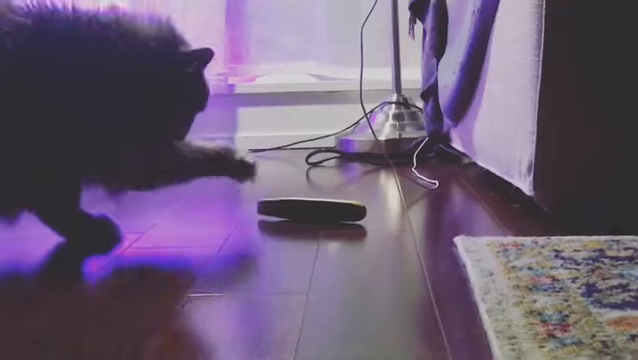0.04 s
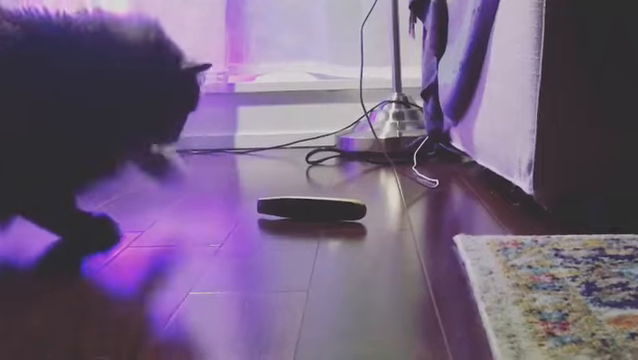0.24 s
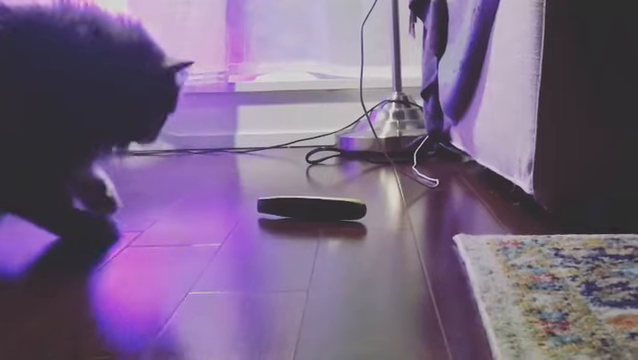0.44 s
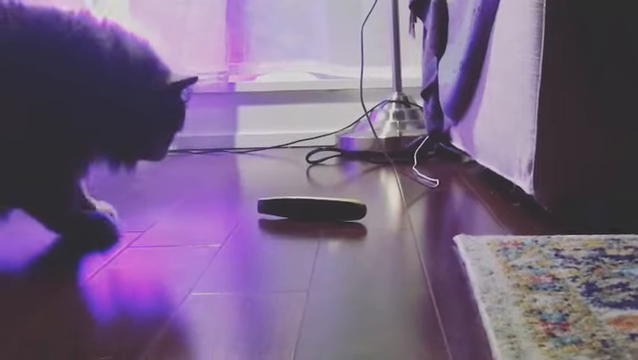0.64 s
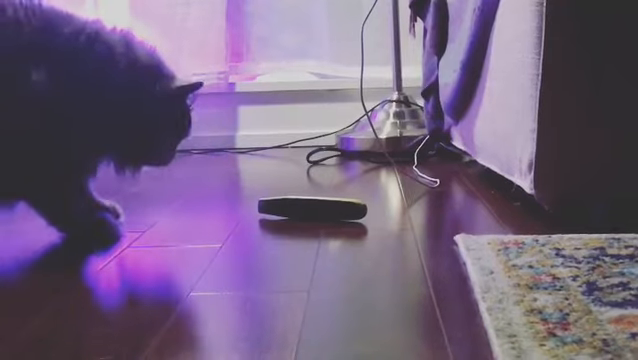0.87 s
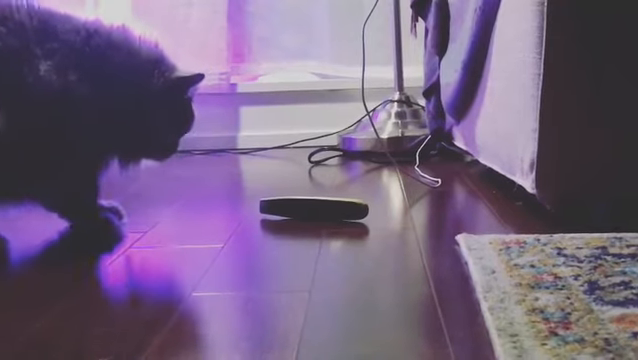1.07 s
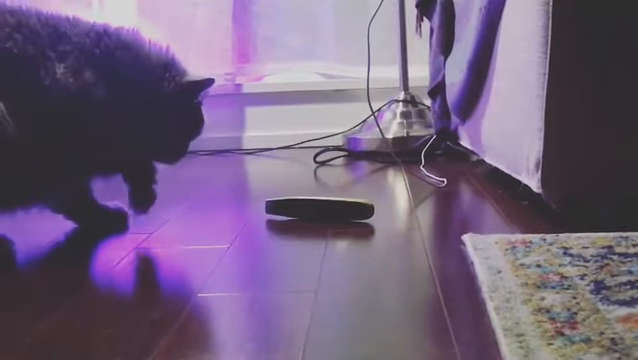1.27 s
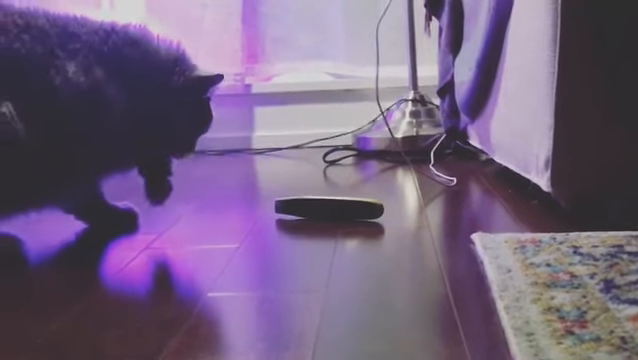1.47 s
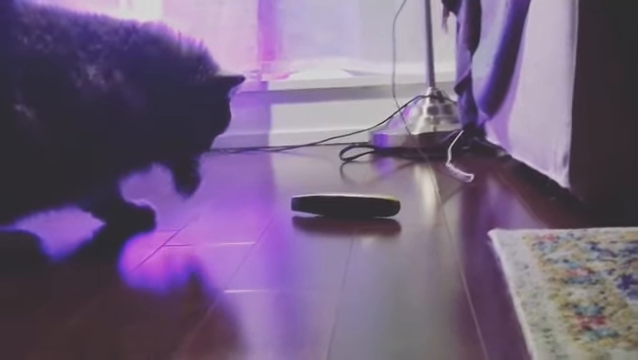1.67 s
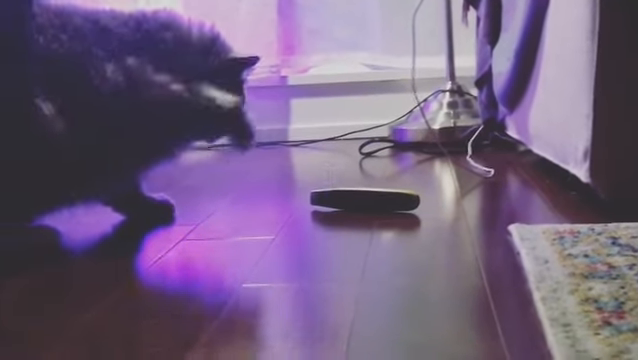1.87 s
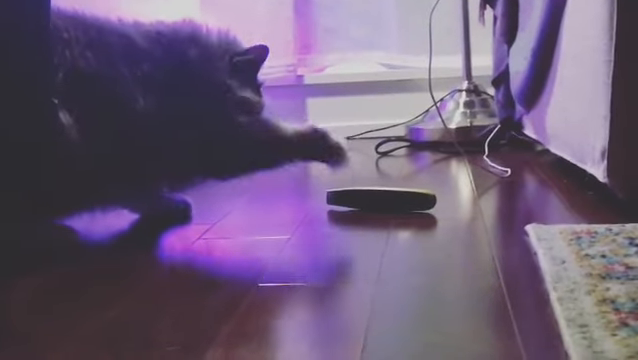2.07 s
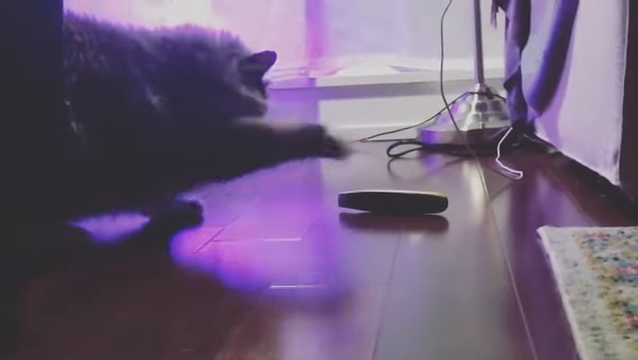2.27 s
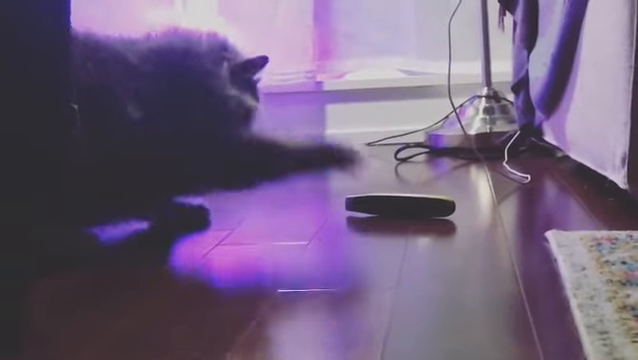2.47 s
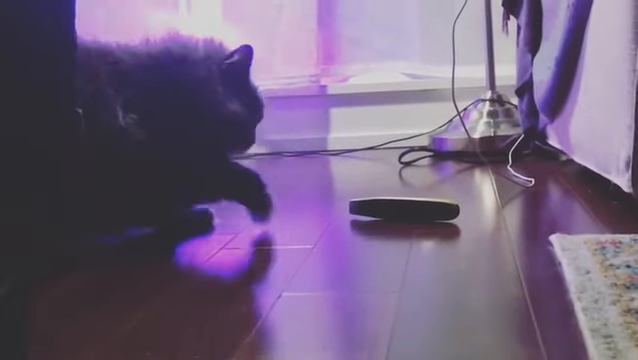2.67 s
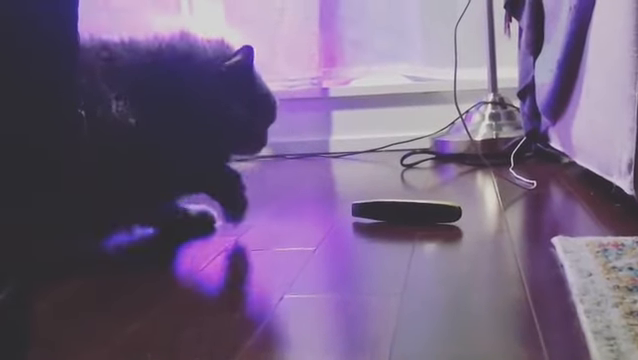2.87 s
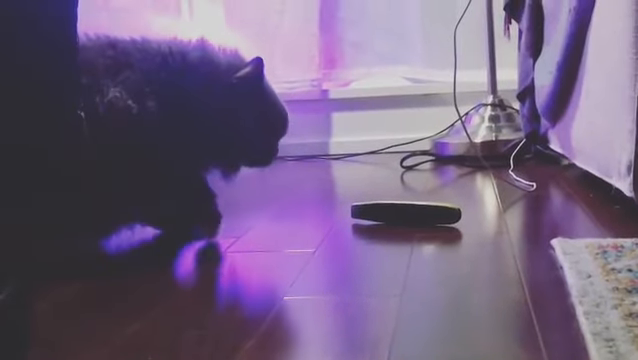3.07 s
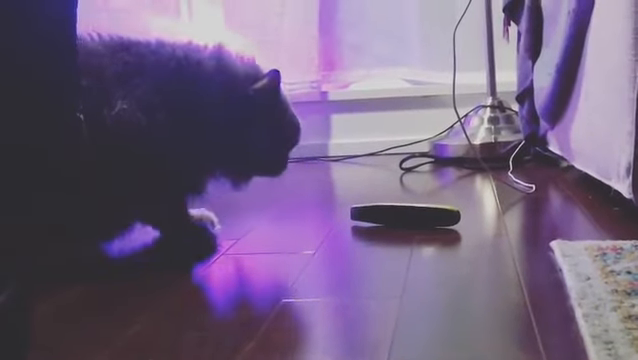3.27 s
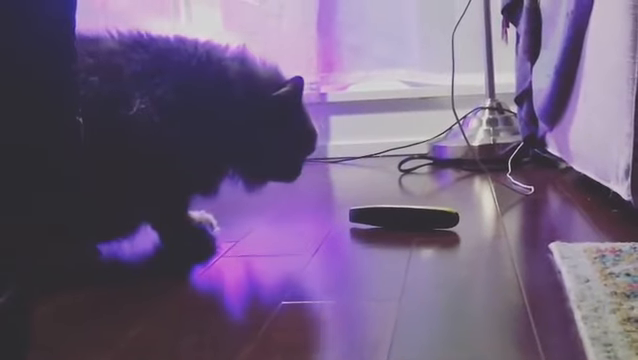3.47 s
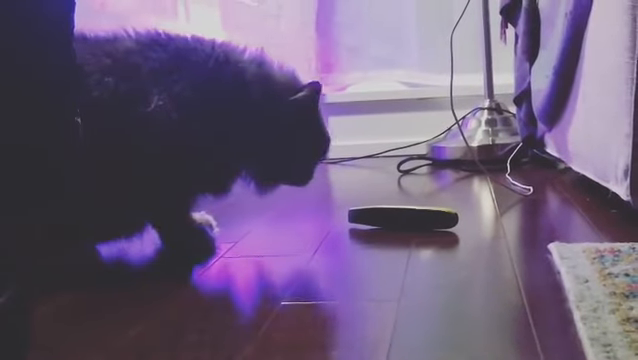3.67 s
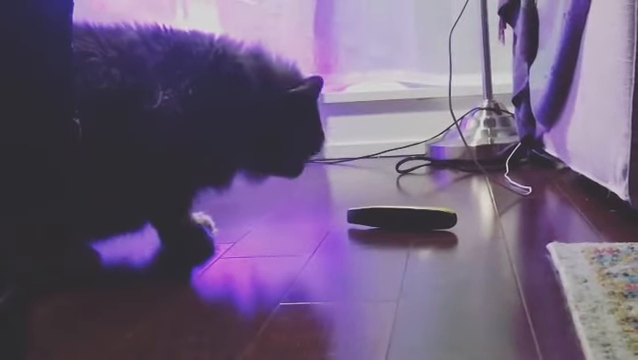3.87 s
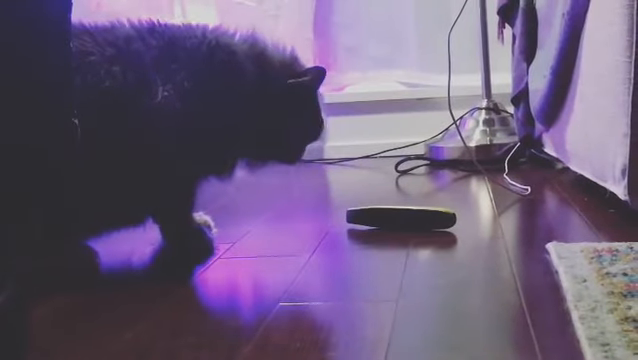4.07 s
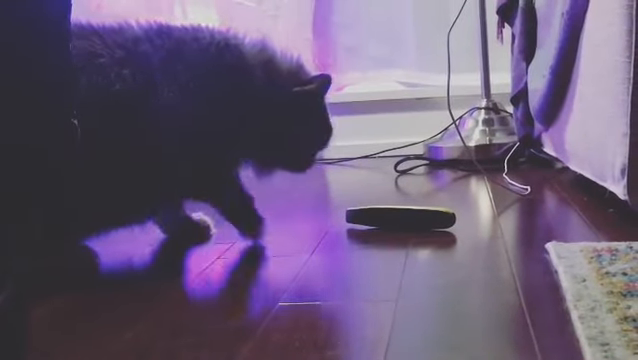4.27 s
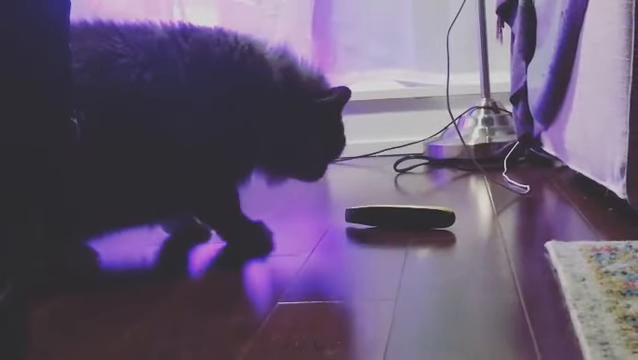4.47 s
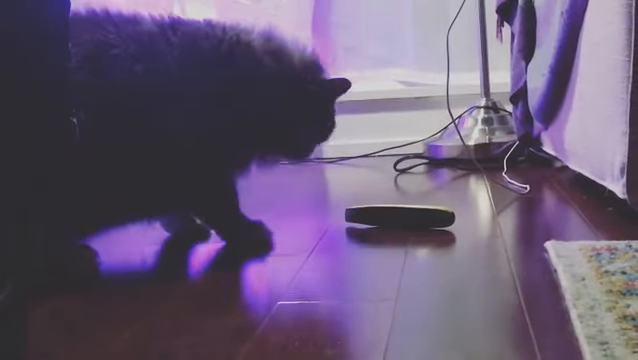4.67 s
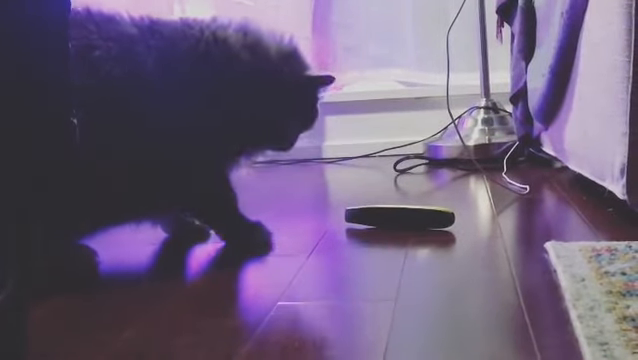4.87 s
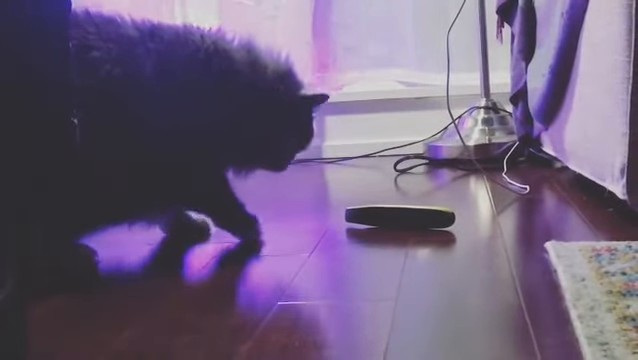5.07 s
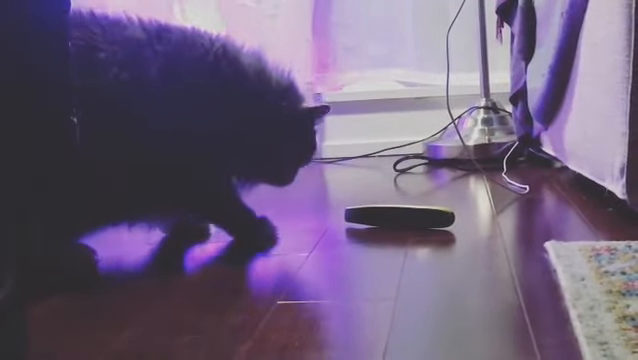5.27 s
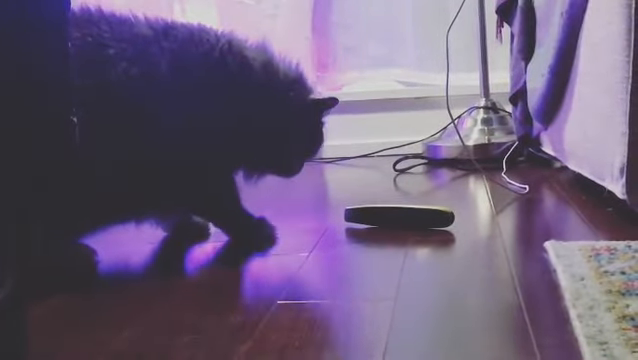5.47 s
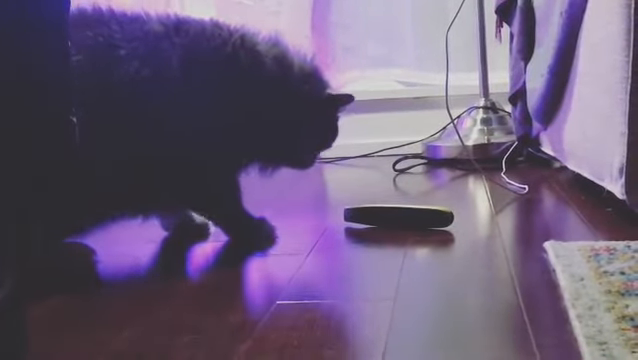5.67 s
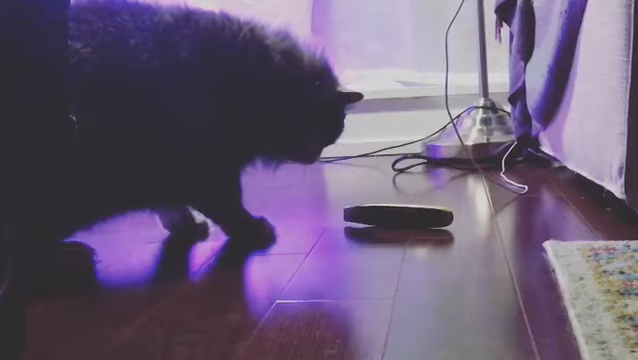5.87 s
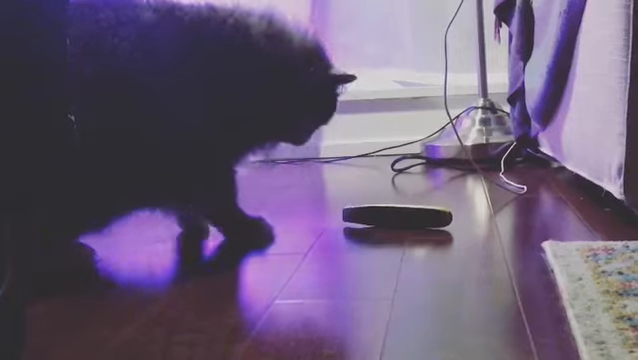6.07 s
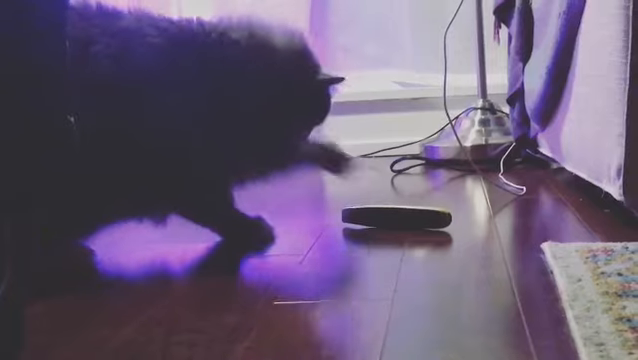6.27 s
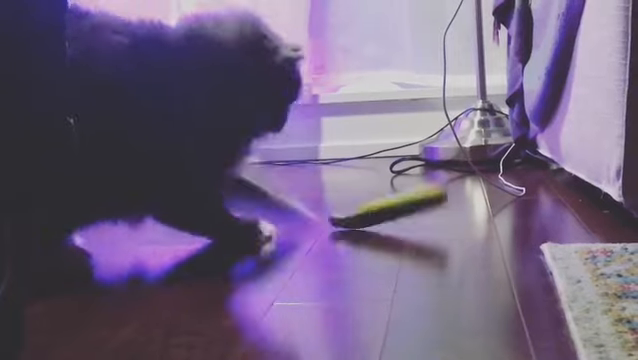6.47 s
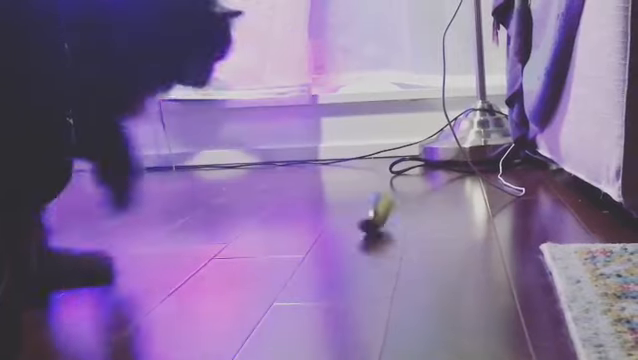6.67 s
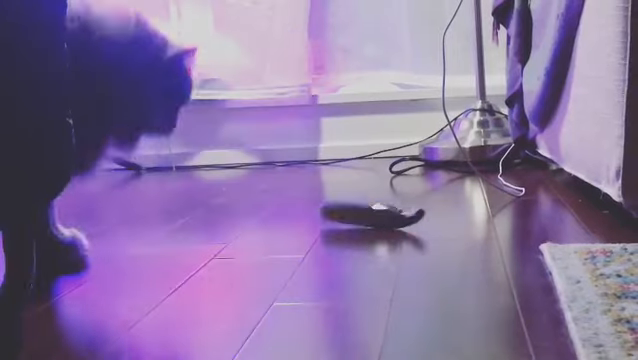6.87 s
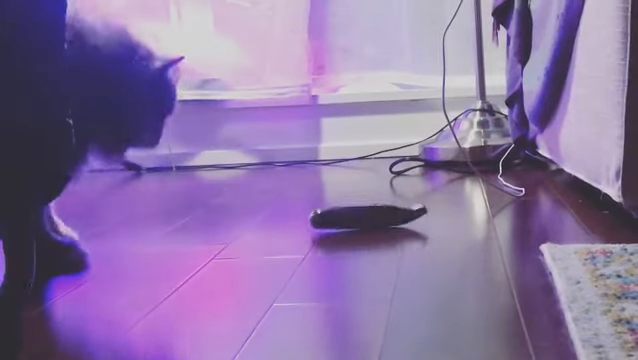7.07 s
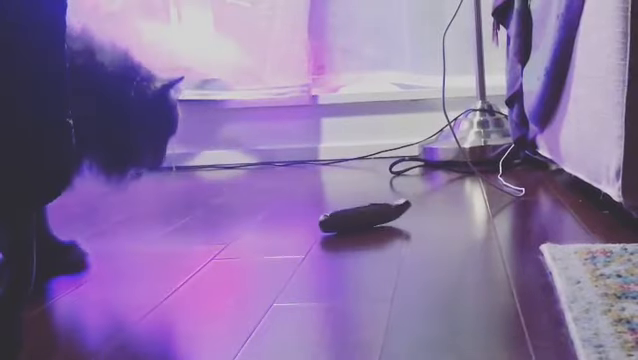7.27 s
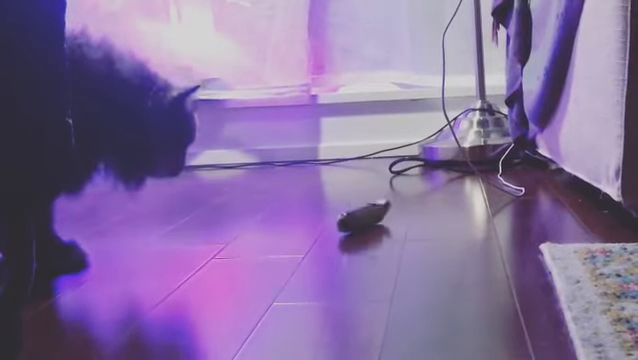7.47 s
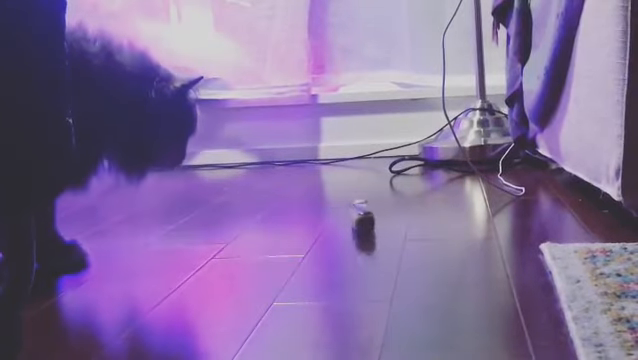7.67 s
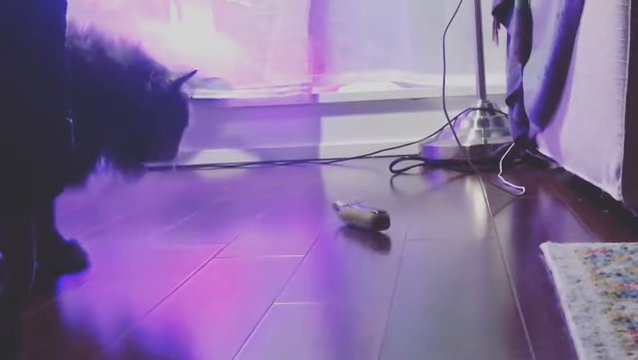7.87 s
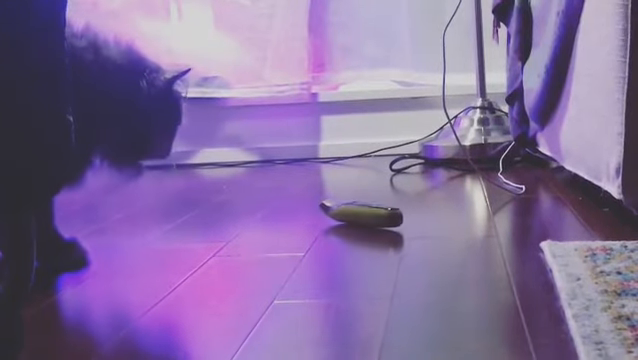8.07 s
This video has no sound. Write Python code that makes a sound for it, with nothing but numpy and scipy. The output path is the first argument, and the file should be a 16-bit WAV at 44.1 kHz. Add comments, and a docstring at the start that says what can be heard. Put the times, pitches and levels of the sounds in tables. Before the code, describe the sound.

An electric shaver buzzes continuously on a wooden floor indoors, close to a low microphone. Faint paw scuffs and soft low thuds barely show beside it. Late on, a cat swats it: a loud cluster of plastic clicks and woody knocks rattles for under a second, ringing in the floor and room. The buzz carries on, its treble brightening and dulling as the shaver slowly turns.

```python
"""Room with a wooden floor: an electric shaver buzzes on the planks while a cat creeps up and swats it.
Its drive makes three strokes a turn: fixed harmonics of the case plus noise gated by each stroke.
Swatted, it clatters on planks and plastic, floor modes and room ring, and it spins slowly on, buzzing.
Narrow-band hisses swell as it turns; around it: noise-burst paw scuffs, low rumble with thuds,
steady air and faint passing hums."""
import sys
import numpy as np
from scipy import signal
from scipy.fft import rfft, irfft
from scipy.io import wavfile

SR = 44100
rng = np.random.default_rng(int(sys.argv[2]) if len(sys.argv) > 2 else 0)


def persist_wave(psi):
    """Save psi, clipped to +-1, as 16-bit WAV."""
    counts = np.round(np.clip(psi, -1, 1) * 32767).astype(np.int16)
    wavfile.write(sys.argv[1], SR, np.atleast_2d(counts).T)


N = 358523
T = np.arange(N) / SR
FREQS = np.arange(N // 2 + 1) * SR / N
TOP_HZ = 13950
TURN_HZ = 39.922
SWAT_S = 6.56


def undb(db):
    """Decibels to gain."""
    return 10 ** (np.asarray(db) / 20)


def along(rows, f, axis=1):
    """One column of a frequency table, interpolated on a log-frequency axis."""
    rows = np.array(rows)
    return np.interp(np.log(f + 1), np.log(rows[:, 0]), rows[:, axis])


def noise(db):
    """Gaussian noise with the given density in dB per Hz."""
    return irfft(rfft(rng.standard_normal(N)) * undb(db), N) * np.sqrt(SR / 2)


def walk(rate_hz):
    """Smooth random drift of unit spread: noise low-passed at rate_hz."""
    sos = signal.butter(2, rate_hz, fs=SR, output="sos")
    drift = signal.sosfilt(sos, rng.standard_normal(N))
    return drift / drift.std()


def lowpass(x, hz, order=2):
    """Butterworth cut of the treble above hz, at most TOP_HZ."""
    return signal.sosfilt(signal.butter(order, min(hz, TOP_HZ), fs=SR, output="sos"), x)


def hiss(hz, half_width_hz):
    """Narrow-band noise of unit spread: a carrier modulated by a random drift."""
    return np.sqrt(2) * walk(half_width_hz) * np.cos(2 * np.pi * hz * T)


def wavering_tone(hz, wander_hz, rate_hz):
    """Sine whose frequency drifts with a spread of wander_hz."""
    return np.sin(2 * np.pi * np.cumsum(hz + wander_hz * walk(rate_hz)) / SR)


def envelope(start_s, attack_s, hold_s, release_s):
    """Straight rise, hold, exponential fall with time constant release_s."""
    age_s = T - start_s
    fall = np.exp(-np.maximum(age_s - attack_s - hold_s, 0) / release_s)
    return np.clip(age_s / attack_s, 0, 1) * fall


def swells(rows):
    """Sum of event envelopes, each peaking at its level half its length after onset."""
    total = np.zeros(N)
    for start_s, db, length_s in rows:
        age = np.maximum(T - start_s, 0) * 2 / length_s
        total += undb(db) * age * np.exp(1 - age)
    return total


def rumble():
    """Low filtered noise of the home whose level swells, with soft thuds standing out of it."""
    level_db, swell_db, swell_hz = -47.5, 1, 7.5
    # rumble colour: (frequency [Hz], relative level [dB])
    colour = [(20, -36), (28, -26), (38, -15), (52, -10.5), (66, -3.5), (82, 3), (105, -6), (140, -6),
              (180, -21), (260, -64)]
    # thuds: (time [s], level [dB], length [s])
    thuds = [(1.04, -46, 0.12), (1.49, -43, 0.061), (3.03, -44, 0.07), (5.45, -46.5, 0.1)]
    low = noise(along(colour, FREQS))
    swell = np.hypot(undb(level_db + swell_db * walk(swell_hz)), swells(thuds))
    return low / low.std() * swell


def air():
    """Steady air of the room: stationary coloured noise."""
    # air spectrum: (frequency [Hz], density [dB per Hz])
    density = [(20, -110), (130, -77.5), (200, -74), (280, -79.5), (345, -83), (430, -79.5), (500, -91),
               (640, -80.5), (725, -81), (800, -99)]
    return noise(along(density, FREQS))


def hums(attack_s=0.068, release_s=0.13, wander_hz=9):
    """Faint low tones, wavering in pitch, that come and go."""
    # hums: (time [s], hold [s], frequency [Hz], level [dB])
    passing = [(0, .2, 375.5, -54.5), (0.944, 0.13, 268, -53.5), (3.28, 0.68, 265.5, -52.5)]
    total = np.zeros(N)
    for start_s, hold_s, hz, db in passing:
        level = undb(db) * envelope(start_s, attack_s, hold_s, release_s)
        total += level * wavering_tone(hz, wander_hz, rate_hz=27.6)
    return total


def cat(grain_db=2, creak_hz=1450, creak_wander_hz=45):
    """Short, grainy noise bursts as paws tap and scuff, the first with small wavering creaks."""
    # taps and scuffs: (time [s], level [dB], length [s])
    scuffs = [(1.943, -46, 0.012), (1.955, -47, 0.022), (1.992, -43, 0.0075), (2.023, -50, 0.016),
              (2.576, -45, 0.014), (2.587, -44, 0.023), (2.614, -48, 0.046)]
    # scuff colour: (frequency [Hz], relative level [dB])
    colour = [(100, -7), (280, 2.5), (480, -6), (760, -3.5), (1150, -10), (1450, -8), (1800, -16),
              (2300, -6), (5000, -42)]
    # creaks: (time [s], level [dB], length [s])
    creaks = [(1.942, -43, .009), (1.959, -41, 0.01)]
    rub = noise(along(colour, FREQS))
    rub = rub * undb(grain_db * walk(90))
    creak = wavering_tone(creak_hz, creak_wander_hz, rate_hz=140)
    return rub / rub.std() * swells(scuffs) + creak * swells(creaks)


def response(points, spread_s=0., size=4096):
    """Causal ring of given spectrum; bending waves lag by spread_s at 1 kHz, their lows more."""
    f = np.arange(size // 2 + 1) * SR / size
    # folded cepstrum gives minimum phase
    cepstrum = irfft(np.log(undb(along(points, f))))
    cepstrum[1:size // 2] *= 2
    cepstrum[size // 2 + 1:] = 0
    bending_phase = 4 * np.pi * spread_s * np.sqrt(1000 * f)
    ring = irfft(np.exp(rfft(cepstrum) - 1j * bending_phase))
    return ring / np.abs(ring).max()


def room(x, build_s=0.0038, early_db=-8, early_s=0.0053, count=14):
    """Early bounces and a diffuse tail: noise bands, each with its own level and decay."""
    # reverberation: (frequency [Hz], level [dB], t60 [s])
    decay = [(150, -37, 1.0), (310, -1, 1), (580, -7.5, 1.04), (1010, -1, 0.5), (1960, -12, 0.66),
             (2900, -10, 0.42), (4100, -2, 0.67), (7950, -10, 1.4), (14000, -8, 0.31)]
    t = T[:2 * SR]
    f = np.arange(SR + 1) / 2
    edges_hz = np.geomspace(100, TOP_HZ, count + 1)
    diffuse = rfft(rng.standard_normal(len(t)))
    early = t * np.exp(-2 * t / early_s)
    early = undb(early_db) * early / np.linalg.norm(early)
    tail = np.zeros(len(t))
    for lo, hi in zip(edges_hz, edges_hz[1:]):
        centre_hz = np.sqrt(lo * hi)
        fade = np.exp(-np.log(1000) * t / along(decay, centre_hz, axis=2))
        fade = fade * (1 - np.exp(-t / build_s))
        late = undb(along(decay, centre_hz)) * fade / np.linalg.norm(fade)
        tail += (late + early) * irfft(diffuse * (f >= lo) * (f < hi))
    return signal.fftconvolve(x, tail)[:N]


def roll(bumps_per_s=70, count=4):
    """Random bumps as the case rocks and rolls, weaker and duller as it slows, then settles."""
    start_s, attack_s, hold_s, release_s = 6.69, 0.073, 0.35, 0.077
    level_db, fade_db_per_s = -41, -11
    bright_hz, dull_hz, slowing_s = 1680, 480, 0.17
    age_s = np.maximum(T - start_s, 0)
    strength = undb(level_db + fade_db_per_s * age_s)
    strength = strength * envelope(start_s, attack_s, hold_s, release_s)
    hits = rng.random(N) < bumps_per_s / SR
    bumps = hits * rng.standard_normal(N) * strength + 1e-18
    speed = np.exp(-age_s / slowing_s)
    # crossfade between fixed low-passes as the speed falls
    total = np.zeros(N)
    for hz, pick in zip(np.linspace(dull_hz, bright_hz, count), np.eye(count)):
        share = np.interp(speed, np.linspace(0, 1, count), pick)
        total += lowpass(bumps * share + 1e-18, hz, order=6)
    return total


def clatter(ring_db=-2.5, spot_db=2, upper_hz=800, size=256):
    """Blows click the plastic, send bending waves through the planks and ring the floor modes."""
    # blows: (time [s], plank knock [dB], plastic click [dB], knock low-pass [Hz], upper-mode lift [dB])
    # the click low-pass lies an octave above that of the knock
    blows = [(6.5406, -19.5, -60, 300, 4), (6.5415, -32, -9, 6900, 0), (6.5926, -28, -50, 1510, 2),
             (6.601, -19, -60, 780, -4), (6.6023, -24.5, -33, 4500, -4), (6.6701, -17.5, -29, 3500, 7),
             (6.672, -22.5, -15, 3500, -2), (6.6732, -7, -34, 3600, -4), (6.675, -27, -8.5, 3950, 0),
             (6.679, -26, -35, 3500, 0), (6.688, -31, -18, 4000, 0), (6.7, -32, -33, 4000, 4),
             (6.715, -23, -41, 4000, 9), (6.7379, -23, -20.5, 6500, 6), (6.7502, -19.5, -34, 5000, 1),
             (6.7545, -19, -28, 6040, 9.5), (6.7582, -21, -28, 6000, 3), (6.771, -25.5, -42, 3000, 3),
             (6.786, -21, -55, 1300, 8), (6.808, -21.5, -55, 1190, -1), (6.8435, -28, -38, 2500, 0),
             (6.8477, -19, -32, 1710, 0), (6.878, -21.5, -55, 890, -4), (6.906, -30, -60, 800, 0),
             (6.921, -26, -60, 806, -2), (6.941, -34, -60, 800, 0), (6.991, -31, -50, 1100, -8),
             (6.9964, -23.5, -38, 1307, -2), (7.013, -25, -55, 800, -4), (7.0378, -25, -40, 2840, 0.5),
             (7.0433, -25, -38, 1500, -2), (7.0463, -23.5, -58, 902, 0), (7.088, -28, -58, 900, 0),
             (7.139, -27.5, -58, 688, 0), (7.169, -30, -60, 657, 0), (7.207, -30, -60, 605, 11),
             (7.241, -30.5, -60, 540, 0), (7.275, -31, -60, 500, 0), (7.32, -32, -60, 300, 0)]
    # knock response of the planks: (frequency [Hz], relative level [dB])
    knock_colour = [(100, -29), (200, -12), (320, 2), (400, 2.5), (480, 1), (540, 7), (615, 6), (710, 2.5),
                    (790, -7), (900, -8.5), (1080, -5), (1270, -11), (1650, -4), (2130, -13), (2900, -3),
                    (4200, -17), (12000, -61)]
    # click response of the plastic: (frequency [Hz], relative level [dB])
    click_colour = [(200, -40), (900, 5.5), (1700, 12), (3000, 8.5), (4500, 10.5), (6300, 8), (7500, 6.5),
                    (9000, 8), (14000, 6.5)]
    # long ring of the floor: (frequency [Hz], level before ring_db [dB], t60 [s])
    floor_modes = [(238, -29.5, 2.2), (319, -26.5, 1.3), (351, -32, .9), (398, -33, .9), (412, -33, .9),
                   (460, -33, 1.1), (520, -30, 1.2), (577, -27.5, .9), (615, -27, .85), (652, -28, .7),
                   (698, -31, .65), (747, -33, .55), (840, -29.5, .55), (878, -30.5, .5), (953, -31, .42),
                   (1058, -32, .38), (1130, -29, .36), (1394, -41, .2), (1656, -31, .12)]
    t = T[:SR]
    hz, db, t60_s = np.transpose(floor_modes)
    decays = np.exp(-np.log(1000) * t / t60_s[:, None])
    modes = undb(db + ring_db)[:, None] * np.sin(2 * np.pi * np.outer(hz, t)) * decays
    knocks, clicks = roll(), np.zeros(N)
    ring = signal.fftconvolve(knocks, modes.sum(0))
    for start_s, knock_db, click_db, bright_hz, upper_db in blows:
        i = int(start_s * SR)
        push = undb(knock_db) * lowpass(signal.unit_impulse(size), bright_hz, order=4)
        knocks[i:i + size] += push
        clicks[i:i + size] += undb(click_db) * lowpass(signal.unit_impulse(size), 2 * bright_hz)
        # every spot hit drives its own mix of modes
        side, scatter = rng.standard_normal((2, len(hz)))
        mix = np.sign(side) * undb(spot_db * scatter + upper_db * (hz > upper_hz))
        ring[i:i + len(t)] += signal.fftconvolve(mix @ modes, push)[:len(t)]
    planks = signal.fftconvolve(knocks, response(knock_colour, spread_s=0.002166))[:N]
    plastic = signal.fftconvolve(clicks, response(click_colour, spread_s=0.001762))[:N]
    direct = planks + plastic
    return direct + room(direct) + ring[:N]


def turning_hiss():
    """Soft narrow-band hisses of the shaver that swell and fade as it turns."""
    # hisses: (peak time [s], fall to 1/e either side [s], centre [Hz], half width [Hz], level [dB])
    hisses = [(6.95, 0.05, 3378, 330, -46.5), (6.975, 0.04, 5480, 700, -53), (7.21, 0.06, 4500, 450, -51.5),
              (7.373, 0.092, 6550, 350, -55), (7.398, 0.23, 3930, 200, -57),
              (7.578, 0.27, 5610, 248, -55.5)]
    total = np.zeros(N)
    for peak_s, length_s, hz, half_width_hz, db in hisses:
        swell = np.exp(-((T - peak_s) / length_s) ** 2)
        total += undb(db) * swell * hiss(hz, half_width_hz)
    return total


def case_db(axis):
    """Lift by the case resonances at FREQS, lying still (column 2) or knocked away (column 3)."""
    # resonances: (centre [Hz], width at half the dB lift [Hz], lift still [dB], lift knocked away [dB])
    resonances = [(1550, 290, 5.5, 2), (2316, 71, 9.5, 1.5), (2984, 130, 6.5, 7.5), (3935, 460, 3.5, 4.5),
                  (9770, 180, 10.5, 7), (11150, 300, 9, 8)]
    lift_db = np.zeros(len(FREQS))
    for row in resonances:
        lift_db += row[axis] / (1 + (2 * (FREQS - row[0]) / row[1]) ** 2)
    return lift_db


def ripple(depth_db=2.0, spacing_hz=70):
    """Many small resonances: random narrow peaks and dips in dB along the spectrum."""
    heights = rng.standard_normal(1024)
    return depth_db * np.interp(FREQS / spacing_hz, np.arange(len(heights)), heights)


def one_turn(colour_db, axis, scatter_db=1.5, snap=3, snap_hz=4200, size=8192):
    """Case vibration over one turn: every third harmonic belongs to the strokes."""
    # individually set harmonics: (order, still [dB], spinning side on [dB], spinning end on [dB])
    set_lines = [(24, -68, -69, -69), (27, -56.5, -70, -70), (29, -71, -80, -80), (33, -65, -70, -81),
                 (36, -70, -76, -76), (37, -69, -78, -78), (38, -68, -77, -77), (39, -57.5, -62, -63),
                 (40, -56.5, -76, -76), (42, -65, -61, -62), (43, -69, -77, -77), (45, -65, -70, -75),
                 (48, -58.5, -71, -73), (51, -55.5, -72, -74), (54, -72, -74, -74), (55, -63, -76, -76),
                 (56, -67, -76, -76), (57, -54, -60, -63), (58, -65, -76, -78), (59, -63, -73, -73),
                 (60, -58.5, -64, -66), (63, -64, -68, -68), (66, -64, -70, -70), (69, -66, -72, -72),
                 (72, -60.5, -69, -66), (75, -56.5, -71, -71), (78, -72, -62, -63), (79, -66, -72, -74),
                 (81, -69, -65, -71), (87, -70, -64, -67), (90, -65, -65, -69), (91, -66, -75, -75),
                 (96, -74, -75, -67), (97, -61, -75, -70), (102, -68, -66, -79), (105, -65.5, -68, -76),
                 (126, -67, -76, -76), (148, -68, -76, -76), (159, -67.5, -72, -76)]
    # other harmonics before colour: (frequency [Hz], stroke harmonics [dB], those between [dB])
    other_lines = [(40, -110, -120), (120, -72.5, -84), (360, -68, -81), (550, -82, -94), (890, -73, -74.5),
                   (1500, -111, -96.5), (2600, -65, -70), (4300, -70.5, -88), (5200, -71, -83.5),
                   (6540, -71.5, -91), (7700, -84, -95), (8300, -90, -97), (9400, -101, -107),
                   (11000, -93, -91), (12100, -108, -116), (13900, -105, -105)]
    order = np.arange(size // 2 + 1)
    f = order * TURN_HZ
    db = np.where(order % 3 > 0, along(other_lines, f, axis=2), along(other_lines, f))
    db = db + np.interp(f, FREQS, colour_db) + scatter_db * rng.standard_normal(len(f))
    for row in set_lines:
        db[int(row[0])] = row[axis]
    bite = np.exp(-(3 * np.arange(size) / size % 1) / .16)
    grit = rng.standard_normal(size)
    # only the treble snaps with each stroke; lower down the case rings on between them
    phase = np.angle(np.where(f > snap_hz, rfft(grit * (1 + snap * bite)), rfft(grit)))
    lines = undb(db) * np.exp(1j * phase) * (f > 0) * (f < TOP_HZ)
    return irfft(lines) * size / np.sqrt(2)


def tones(turns, end_on, flutter=0.03, play_turns=.0001, echo=0.61, lag_s=0.00021, count=3):
    """Steady buzz; after the swat the case shows now its side, now its end, with other harmonics."""
    weak_db = -3.0  # on the other harmonics, once knocked away
    place = (turns + play_turns * walk(15)) % 1
    knocked_colour_db = case_db(axis=3) + weak_db
    shapes = (one_turn(case_db(axis=2), axis=1),
              one_turn(knocked_colour_db, axis=2),
              one_turn(knocked_colour_db, axis=3))
    still, side, end = (np.interp(place, np.linspace(0, 1, len(w), endpoint=False), w)
                        for w in shapes)
    knocked = np.clip((T - SWAT_S) / 0.15, 0, 1)
    moving = side * np.sqrt(1 - end_on) + end * np.sqrt(end_on)
    # bounces with shifting paths make each harmonic wax and wane on its own
    bounces = np.zeros(N)
    for late_s in rng.uniform(0.00304, .02, count):
        bounces += np.interp(T - late_s - lag_s * walk(1.24), T, moving)
    moving = (moving + echo * bounces) / np.sqrt(1 + count * echo ** 2)
    buzz = np.sqrt(1 - knocked) * still + np.sqrt(knocked) * moving
    return buzz * (1 + flutter * walk(34))


def rasp(turns, spun, treble_db, split_hz=3600, echo=0.065, lag_s=0.00058):
    """Cutter noise, hardest once a stroke; a floor bounce sweeps its colour during the spin."""
    # cutter in its case: (frequency [Hz], density before case lift and levels [dB per Hz])
    density = [(300, -100), (650, -95.5), (820, -93), (1250, -89.5), (2200, -86.5), (4000, -85.5),
               (4600, -88.5), (5500, -90), (6500, -84), (7200, -101), (8400, -92.5), (10500, -102),
               (12600, -102), (13500, -109)]
    stroke = 3 * turns % 1
    # the three strokes of a turn differ in strength, and no two turns are alike
    strength = 1 + .45 * np.cos(2 * np.pi * turns) + .2 * walk(60)
    bite = np.exp(-stroke / .16) * strength
    chatter = .12 * np.cos(6 * np.pi * stroke) + .1 * np.cos(8 * np.pi * stroke)
    # the case rings on and smooths the middle range; the treble follows each stroke closely
    gates = 1 + .25 * bite + chatter, 1 + 1.05 * bite + chatter
    colour = undb(along(density, FREQS) + case_db(axis=2) + ripple()) * np.sqrt(SR / 2)
    grit = rng.standard_normal(N)
    body, edge = (rfft(grit * gate / np.sqrt(np.mean(gate ** 2))) * colour for gate in gates)
    lower = 1 / (1 + (FREQS / split_hz) ** 4)
    sound = irfft(body * lower, N) + undb(treble_db) * irfft(edge * (1 - lower), N)
    # once knocked over, the case rests on another face and resonates differently
    knocked = np.clip(spun * 10, 0, 1)
    turned = irfft(rfft(sound) * undb(case_db(axis=3) - case_db(axis=2)), N)
    sound = sound + (turned - sound) * knocked
    bounce = np.interp(T - lag_s * (1 + 0.69 * np.cos(4 * np.pi * spun)), T, sound)
    share = echo * knocked
    return (sound + share * bounce) / np.sqrt(1 + share ** 2)


def vary_bands(x, depth_db=4.0, rate_hz=9, count=9):
    """Slow random level changes, separate for each treble band and deeper towards the top."""
    spectrum = rfft(x)
    centres_hz = np.linspace(3000, TOP_HZ, count)
    total = np.zeros(N)
    for k, pick in enumerate(np.eye(count)):
        band = irfft(spectrum * np.interp(FREQS, centres_hz, pick), N)
        total += band * undb(depth_db * k / count * walk(rate_hz))
    return total


def shaver(drift_hz=0.0072):
    """Tones and rasp locked to one drive; the rasp dulls when the case points at the microphone."""
    fling_turns, fling_s, spin_turns_per_s = 0.26, 0.23, 0.414
    still_tone_db, still_rasp_db, still_treble_db = -0.46, 0, -2.5
    # changes once knocked away
    knocked_tone_db, knocked_rasp_db, knocked_treble_db = 5, 0.7, 1.5
    # changes while end on to the microphone
    end_rasp_db, end_treble_db, end_sharpness = -3, -10, 6.1
    # the tones weaken while the rocking case barely touches the floor
    lift_db = -4 * envelope(SWAT_S, attack_s=.12, hold_s=0.7, release_s=0.32)
    turns = np.cumsum(TURN_HZ + drift_hz * walk(2.34)) / SR
    age_s = np.maximum(T - SWAT_S, 0)
    knocked = 1 - np.exp(-age_s / fling_s)
    # flung round by the swat, then turning slowly on its own vibration
    spun = fling_turns * knocked + spin_turns_per_s * age_s
    end_on = np.abs(np.sin(2 * np.pi * spun)) ** end_sharpness
    tone_db = still_tone_db + knocked_tone_db * knocked + lift_db
    rasp_db = still_rasp_db + knocked_rasp_db * knocked + end_rasp_db * end_on
    treble_db = still_treble_db + knocked_treble_db * knocked + end_treble_db * end_on
    buzz = undb(tone_db) * tones(turns, end_on)
    scrape = undb(rasp_db) * rasp(turns, spun, treble_db)
    return vary_bands(buzz + scrape)


def scene():
    """Everything as it reaches one microphone near the floor."""
    home = rumble() + air() + hums()
    return (home + cat() + clatter() + turning_hiss() + shaver())[None]


def record(dry):
    """Steep elliptic low-pass at TOP_HZ."""
    return signal.sosfilt(signal.ellip(10, .2, 80, TOP_HZ, fs=SR, output="sos"), dry)


dry = scene()
out = record(dry)
persist_wave(out)
```